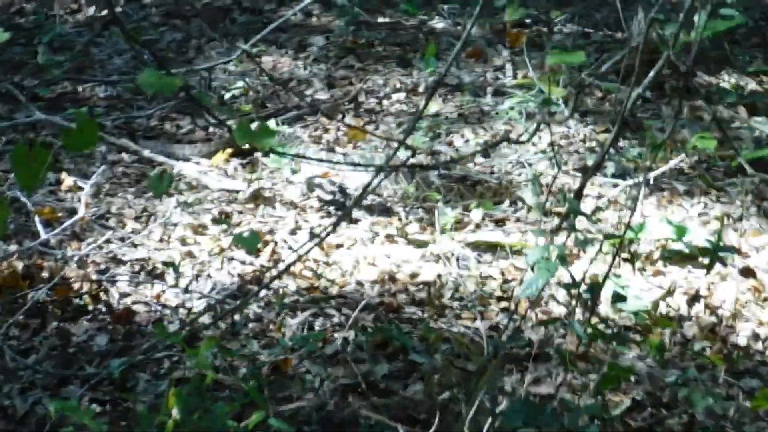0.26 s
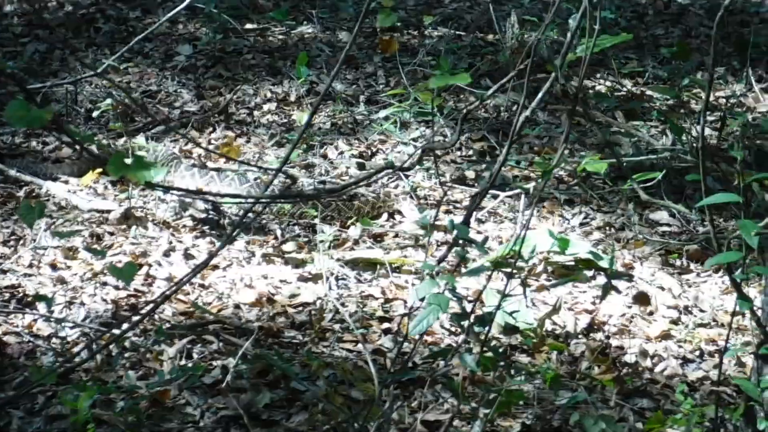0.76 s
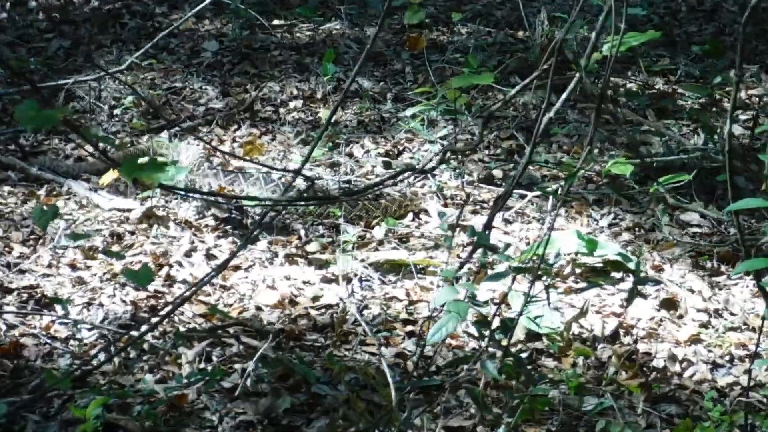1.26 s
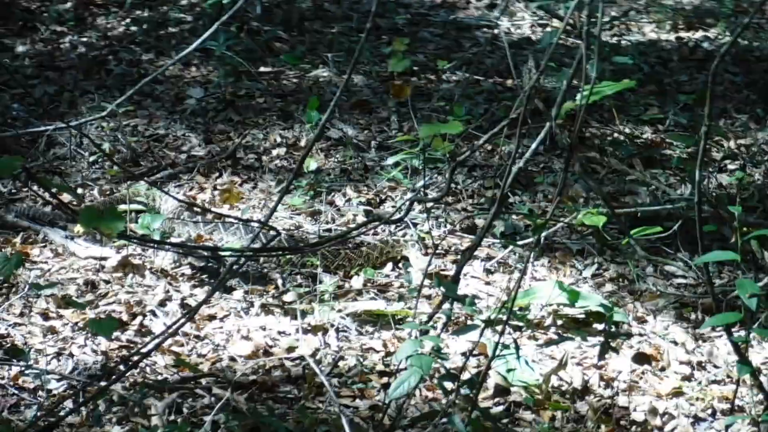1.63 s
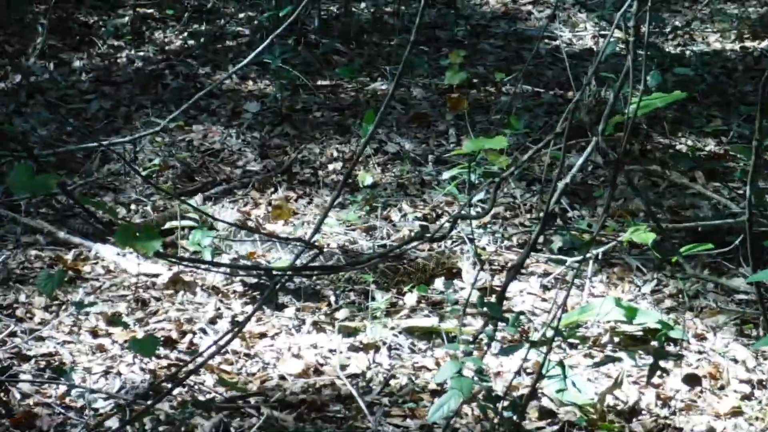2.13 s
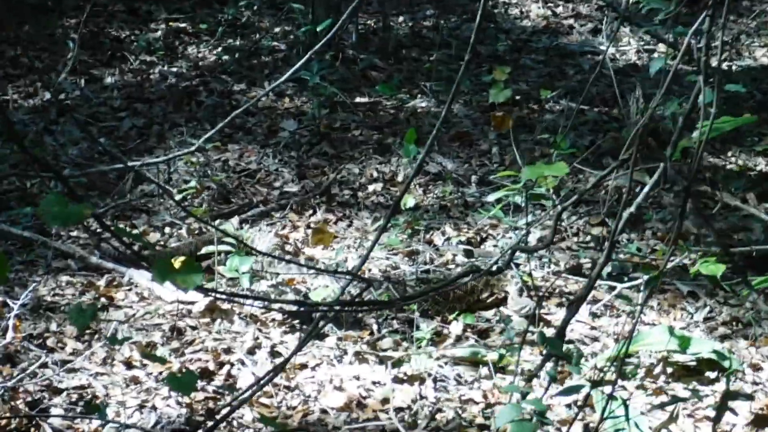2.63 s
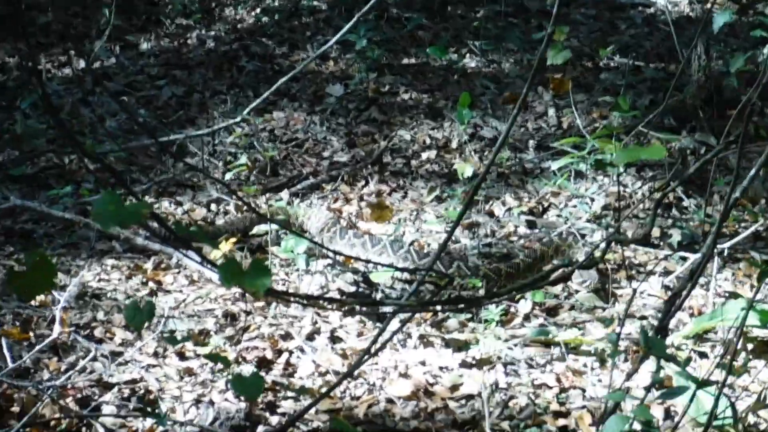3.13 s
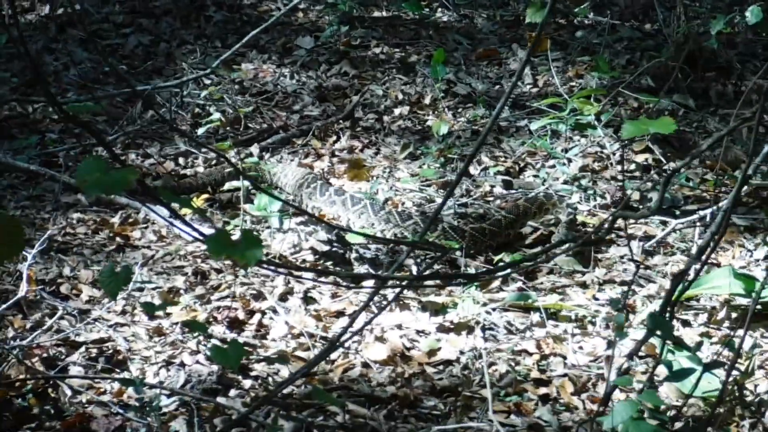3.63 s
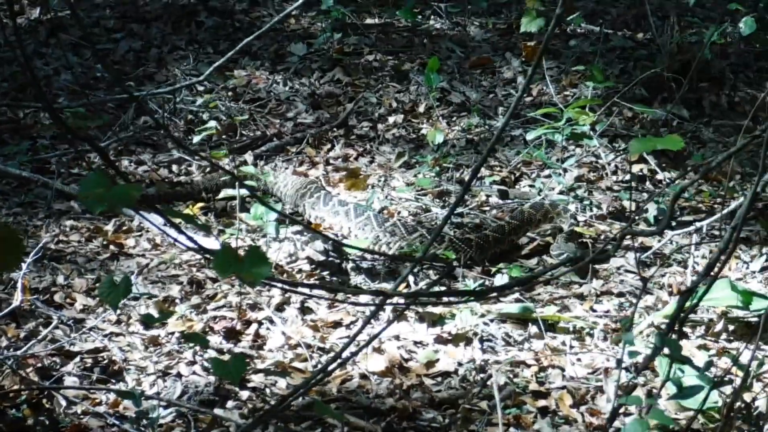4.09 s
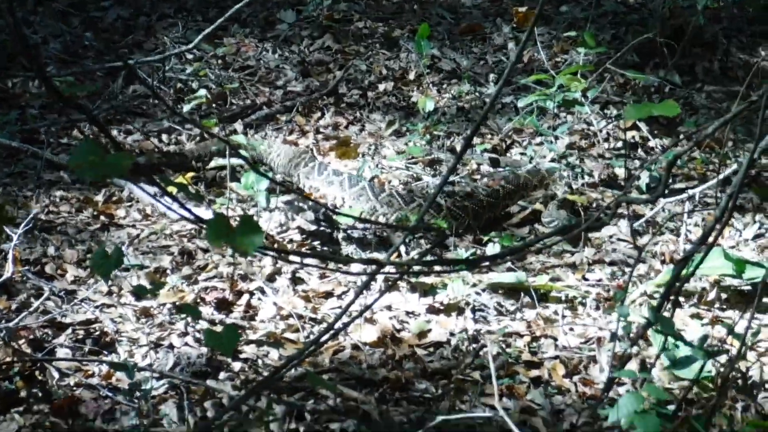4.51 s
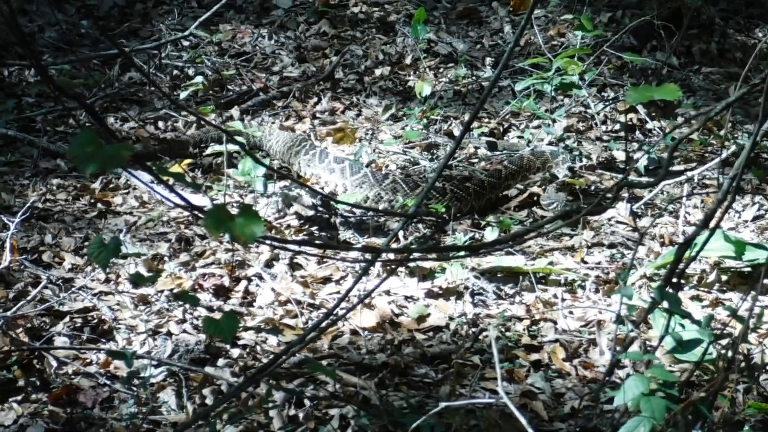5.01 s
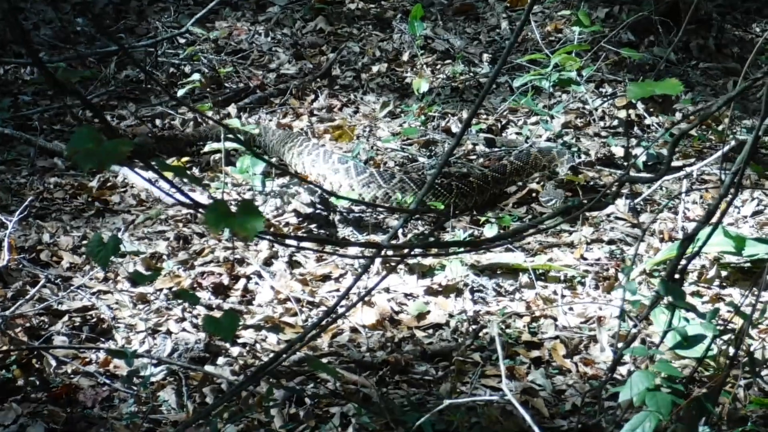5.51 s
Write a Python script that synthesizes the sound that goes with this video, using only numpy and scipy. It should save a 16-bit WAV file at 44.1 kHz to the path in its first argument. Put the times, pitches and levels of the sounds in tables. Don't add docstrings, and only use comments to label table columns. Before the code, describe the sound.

A heavy snake drags through dry leaves with dense crackling and sharp twig snaps, then settles into near-silence with faint ticks and a tiny squeak.

```python
import sys
import numpy as np
from scipy import signal
from scipy.fft import rfft, irfft, next_fast_len
from scipy.io import wavfile
from scipy.ndimage import uniform_filter1d

SR = 44100
rng = np.random.default_rng(int(sys.argv[2]) if len(sys.argv) > 2 else 0)


def invert_db(level):
    return 10 ** (np.asarray(level, dtype=float) / 20)


def master(y):
    cut = np.clip(np.atleast_2d(y).T, -1, 1)
    pcm = np.round(cut * 32767)
    wavfile.write(sys.argv[1], SR, pcm.astype(np.int16))


N = 253575
T = np.arange(N) / SR


def level(x, db):
    return x * invert_db(db) / np.sqrt(np.mean(x ** 2))


def colour(x, points):
    hz, db = np.transpose(points)
    octave_like = np.log(np.fft.rfftfreq(8192, 1 / SR) + 1)
    log_gain = np.interp(octave_like, np.log(hz), db) * np.log(10) / 20
    cepstrum = irfft(log_gain)
    cepstrum[1:4096] *= 2
    cepstrum[4097:] = 0
    return signal.fftconvolve(x, irfft(np.exp(rfft(cepstrum))))[:N]


def band(x, lo_hz, hi_hz):
    return signal.sosfilt(signal.butter(2, [lo_hz, hi_hz], "bandpass", fs=SR, output="sos"), x)


def smooth_twice(x, samples):
    return uniform_filter1d(uniform_filter1d(x, samples), samples)


def fade(x, ms):
    return signal.lfilter([1], [1, -np.exp(-1000 / (ms * SR))], x)


def walk(rate_hz):
    hold = int(SR / rate_hz)
    return smooth_twice(np.repeat(rng.standard_normal(N // hold + 1), hold), hold)[:N]


def glide(hz):
    return np.sin(2 * np.pi * np.cumsum(hz) / SR)


def tent(s, db, swell, ease):
    before, after = np.maximum(s - T, 0), np.maximum(T - s, 0)
    return invert_db(2 * (db - abs(swell) * before - abs(ease) * after))


# crest t/s, leaf level/dB, swell/dB per s, ease/dB per s, weight on the litter/dB
BODY_SHOVES = [(0.003, -33, 105, 102, 5.0), (0.299, -37, 30, 78, 2.5), (0.548, -38, 30, 66, -2),
               (0.737, -49, 116, 233, -6), (0.926, -60, 66, 26, 0), (1.061, -41, 301, 24, -1.0),
               (1.157, -38.5, 173, 42, 2), (1.296, -34, 97.5, 72, 3), (1.65, -55.5, 66, 20, 0.3),
               (1.944, -45.5, 53, 108, -2.5), (2.056, -43.5, 33, 177, 1.2), (2.39, -55, 110, 30, -10),
               (2.373, -40, 538, 97, 2), (2.484, -40, 131, 332, 7), (2.539, -41.1, 72, 1023, 2.5),
               (2.597, -51, 488, 15.5, 1.5), (2.731, -43.5, 99, 38, 2.7), (2.853, -40, 71, 61, 1),
               (3.039, -47, 18, 46, -2), (3.13, -51.5, 351, 22, -1.7), (3.517, -47.3, 44, 137, 0.2),
               (3.724, -57.1, 48, 8.5, 1.1), (4.436, -62.5, 0, 31, -3.5), (5.349, -61.5, 30, -5, -1)]
# level at a -40 dB shove/dB, slope/dB per dB, share of the weight
LEAF_LAYERS = [
    (-58, 0.48, 1.2),
    (-54, 0.6, 1.17),
    (-40.5, 1, 0),
    (-49.5, 1.0, 0.49),
]


def drag():
    creep_db = -72
    shoves = np.array([tent(*row[:4]) for row in BODY_SHOVES])
    total = shoves.sum(axis=0) + invert_db(2 * creep_db)
    weight_db = np.array(BODY_SHOVES)[:, 4] @ shoves / total
    shove_db = 10 * np.log10(total)
    return [db + slope * (shove_db + 40) + share * weight_db for db, slope, share in LEAF_LAYERS]


# f/Hz, level/dB per Hz
LEAF_COLOUR = [(88, -47.5), (150, -27.5), (201, -23.5), (230, -24.5), (413, -20.5), (916, -20), (1010, -20),
               (1330, -12.5), (1780, -12.5), (2420, -15.5), (4180, -7), (6050, 3), (7950, -6.5),
               (13200, -8.5), (15700, -16.5)]
LAYER_BORDERS = [1200, 3600, 9000]


def leaf_bands(drives):
    size = next_fast_len(N + 8192)
    octave = np.log2(np.fft.rfftfreq(size, 1 / SR) + 1)
    steps = [1]
    for hz in LAYER_BORDERS:
        across = np.clip((np.log2(hz) - octave) / 0.6 + 0.5, 0, 1)
        steps.append(np.cos(np.pi / 2 * across) ** 2)
    steps.append(0)
    leaf = rfft(colour(np.arange(N) == 0, LEAF_COLOUR), size)
    spectrum = 0
    for drive, above, beyond in zip(drives, steps, steps[1:]):
        part = leaf * (above - beyond)
        spectrum = spectrum + rfft(drive, size) * part / np.sqrt(np.mean(abs(part) ** 2))
    return irfft(spectrum, size)[:N]


def rustle(rate_hz=1900, spread_db=3.0, tint_db=2.5, crack_ms=0.5, tail_ms=6, tail_db=-15, clump_db=3.0):
    litter_db, stem_db, blade_db, edge_db = drag()
    happens, size = rng.random((2, N))
    clumps = invert_db(2 * clump_db * walk(60))
    power = (happens < rate_hz / SR) * invert_db(-2 * spread_db * np.log(size + 0.0074)) * clumps
    envelopes = []
    for db in (litter_db, stem_db + 0.5, blade_db, edge_db):
        hits = power * invert_db(2 * tint_db * rng.standard_normal(N))
        crack = fade(fade(hits, crack_ms), crack_ms / 2)
        shape = crack + invert_db(2 * tail_db) * fade(hits, tail_ms)
        local = smooth_twice(shape, 2200)
        envelopes.append(np.sqrt(shape / (local + 1e-12)) * invert_db(db))
    return leaf_bands(np.array(envelopes) * rng.standard_normal(N))


# t/s, peak level/dB, settling tail/dB
BLADE_CRACKS = [(.0424, -16, -28), (.0468, -5.5, -23), (.1634, -13, -36), (.172, -5.5, -28),
                (.2393, -16, -23), (.2654, -17, -26), (.3417, -20, -22), (.3716, -20, -26),
                (.4168, -13, -28), (.5174, -19, -34), (.5328, -16, -32), (.5399, -18, -20),
                (.61, -19.5, -26), (.7702, -21, -29), (1.3758, -14, -35), (1.4164, -19.5, -22),
                (1.4983, -19.5, -40), (1.5407, -26.5, -11.5), (1.946, -24, -24), (2.152, -25, -18),
                (2.6289, -20, -21), (2.916, -16.5, -22), (3.0705, -16, -19), (3.2156, -23.5, -31),
                (3.506, -23, -37), (3.5234, -26, -38), (3.5418, -27, -29), (4.2337, -32, -20),
                (5.029, -36, -24), (5.4131, -34, -19)]
# t/s, peak level/dB, brightness/dB
RIM_SHATTERS = [(.0059, -6.5, -8.5), (0.0629, -17, -2), (0.0957, -13.5, -14), (0.1078, -20, -12),
                (0.2195, -15.5, -6.5), (0.2863, -12, -12), (0.2932, -10.5, -9), (.4322, -7, -8),
                (.7461, -25, -7), (1.0044, -21.5, -9), (1.041, -27, -19), (1.2724, -18, -17),
                (1.8011, -25.5, -5), (1.864, -18, -14), (1.9091, -16, -9), (2.3725, -21, -16),
                (2.4842, -13.5, -13), (2.5144, -11.5, -10), (2.5253, -15.5, -7), (2.663, -21, -7),
                (2.9859, -11, -12), (3.8387, -31.5, -13), (3.895, -27, -16), (4.385, -32.5, -9),
                (.9617, -33, -20), (3.47, -20, -12), (5.5094, -39, -18), (5.576, -38, -6),
                (.2075, -22, -16), (1.2191, -28, -25)]
# t/s, peak level/dB, brightness/dB, settling tail/dB
STALK_BREAKS = [(0.1455, -22, -11, -12), (0.1498, -15.5, -19, -20), (0.3244, -21, -20, -16),
                (.3954, -17, -10, -10), (.5802, -18, -29, -34), (1.1408, -15.5, -19, -20),
                (1.1667, -12, -6, -20.5), (1.2408, -22.5, -18, -12), (1.3138, -16.5, -5, -24),
                (1.564, -23, -9, -17), (1.726, -10, -16.5, -17.5), (1.813, -22.5, -23, -28),
                (1.8764, -22, -6, -22), (1.893, -13, -14, -19.5), (1.981, -21.5, -21, -24),
                (2.0364, -29, -19, -11), (2.2216, -18, -17, -15.5), (2.4033, -18.5, -13, -9),
                (2.4161, -15, -11, -13), (2.4346, -20, -9, -10), (2.7075, -16, -15, -19),
                (2.8054, -14.5, -3, -24), (2.9515, -21.5, -9, -15), (3.021, -22.5, -5, -27),
                (3.4137, -23.5, -11, -13), (3.4353, -12.5, -18, -26), (4.175, -30, -10, -18),
                (5.3798, -29, -17, -20), (5.6064, -32, -6, -22), (5.742, -34, -12, -19)]
# t/s, peak level/dB, thud/dB, body/dB
TWIG_SNAPS = [(.0252, -14.5, -16, -17), (0.4113, -11, -9.5, -1), (0.6688, -31, -9, 1),
              (0.6973, -8.5, -15, -7.5), (0.9851, -11.5, -10.5, -4.5), (1.5915, -22, -18, -15),
              (1.719, -20.5, -11.5, -7), (2.2485, -21, -11, 2), (2.2987, -31, -13, 0),
              (2.3118, -31.5, 4.5, 4.5), (2.3928, -10.5, -21, -11), (2.4425, -16.5, -12.5, -7),
              (2.4524, -22, -15, -11), (2.4706, -25, -16.5, -3), (2.6796, -17.5, -11.5, -14),
              (2.7322, -19, -19, -18), (2.7485, -17, -12, -5.5), (2.769, -27.5, -4, -3),
              (2.792, -27, -2.5, -5), (2.8905, -12, -18, -14), (3.1025, -19, -26, -8),
              (3.1229, -23, -19, -10), (3.7526, -29.5, -23, -4), (4.1545, -33.5, -22, 0),
              (5.214, -35.5, -8, -11), (0.077, -22, -22, -12), (1.345, -28.5, 0.5, 0),
              (1.405, -35.5, 3, -8)]
# t/s, peak level/dB, thud/dB, body/dB
STICK_BREAKS = [
    (.0004, -11, -21, -16),
    (0.4, -13, -25, -26),
    (2.192, -34, -20, -12),
    (3.315, -31, -16, -2),
    (2.8125, -20, -34, -18),
    (1.612, -34, -2, 0.5),
    (1.8484, -21.5, -5.5, -1.5),
    (2.06, -25, -6, -20),
    (2.0155, -5.5, -12, -5.5),
    (2.1081, -28.5, -9, -21),
]


def breaks():
    blades = [(s, db, -35, -28.5, -24, tail) for s, db, tail in BLADE_CRACKS]
    rims = [(s, db, -40, -22, bright, -23.5) for s, db, bright in RIM_SHATTERS]
    stalks = [(s, db, -26, -10, bright, tail) for s, db, bright, tail in STALK_BREAKS]
    twigs = [(*row, -12.5, -22) for row in TWIG_SNAPS]
    sticks = [(*row, -49, -21) for row in STICK_BREAKS]
    return blades + rims + stalks + twigs + sticks


def snaps(crest_db=-5, rise_ms=0.99, burst_ms=0.51, tail_ms=5.7):
    power, jolt = np.zeros((4, N + SR)), np.zeros((4, N))
    ms = np.arange(SR // 20) * 1000 / SR
    lag = int(0.0012 * SR)
    jolt_db, tear_db = np.array([13, 9, 8, 7]), np.array([-7, -2, 4, 6])
    rise = (1 - np.exp(-ms / rise_ms)) ** 2
    tear = np.exp(-2 * ms / burst_ms) * invert_db(2 * 3.95)
    for s, db, thud, body, bright, tail_db in breaks():
        i = int(s * SR)
        gain = invert_db(db + crest_db + np.array([thud, body, 0, bright]))
        settling = invert_db(2 * (tail_db + 0.5)) * np.exp(-ms / tail_ms)
        power[:, i:i + len(ms)] += np.outer((gain * invert_db(tear_db)) ** 2, rise * (tear + settling))
        jolt[:, i + lag] += gain * invert_db(jolt_db)
    tearing = np.sqrt(power[:, :N]) * rng.standard_normal(N)
    return leaf_bands(jolt + 0.1 * np.roll(jolt, lag, axis=1) + tearing)


# f/Hz, level/dB per Hz
WOOD_COLOUR = [(12, -44), (20, -5), (85, -5.5), (133, -2.5), (197, -5), (635, -15), (863, -13),
               (1050, -24.5), (1280, -10.5), (1830, -22), (2230, -22.5), (3480, -25), (5920, -16),
               (8990, -26), (15700, -27)]


def wood_air():
    return level(colour(rng.standard_normal(N), WOOD_COLOUR), -57) * invert_db(1.0 * walk(3.38))


# centre f/Hz, width/Hz, level/dB
CHORUS_BANDS = [
    (1288, 128, -66.5),
    (1550, 280, -68.5),
    (5080, 720, -70.5),
]


def chorus():
    out = np.zeros(N)
    for hz, width, db in CHORUS_BANDS:
        voices = band(rng.standard_normal(N), hz - width / 2, hz + width / 2)
        out += level(voices, db) * invert_db(2.0 * walk(16))
    return out


# on t/s, off t/s, level/dB
MOTOR_RUNS = [
    (.0, 0.763, -65),
    (1.694, 2.83, -63),
    (3.72, 4.2, -69.5),
    (4.417, 5.75, -64),
]


def lens_motor():
    runs = sum(invert_db(db) * (T >= on) * (T < off) for on, off, db in MOTOR_RUNS)
    tone = glide(138.9 * (1 + 0.012 * walk(6)))
    return np.sqrt(2) * uniform_filter1d(runs, 1500) * tone * invert_db(3.0 * walk(20))


def drone():
    return level(band(rng.standard_normal(N), 118.9 - 4, 118.9 + 4), -73)


# t/s, level/dB
GRIP_SHIFTS = [(0.0, -52), (1.73, -56), (2.02, -55), (2.22, -62), (2.56, -61), (3.03, -61.5), (3.27, -61.5),
               (3.6, -61), (5.6, -62), (4.23, -68), (4.55, -66), (4.79, -67)]


def hand_grip():
    rest_db, swell_db_s, ease_db_s = -68, 110, 112
    power = invert_db(2 * rest_db) + sum(tent(s, db, swell_db_s, ease_db_s) for s, db in GRIP_SHIFTS)
    return level(band(rng.standard_normal(N), 28, 88), 0) * np.sqrt(power)


# t/s, f/Hz, level/dB, 60 dB decay/s
STICK_KNOCKS = [
    (1.8478, 300, -11, .022),
    (1.8486, 500, -19, .013),
    (1.8486, 680, -26, .012),
    (2.0166, 300, -20, .012),
    (2.0168, 110, -24, .03),
    (2.105, 480, -46, .03),
    (2.3112, 780, -41, .015),
    (3.436, 1200, -33, .025),
]


def knocks():
    out = np.zeros(N)
    for s, hz, db, t60 in STICK_KNOCKS:
        t = np.maximum(T - s, 0)
        swing = (1 - np.exp(-1.6 * hz * t)) ** 2
        out -= invert_db(db - 60 * t / t60) * swing * np.sin(2 * np.pi * hz * t)
    return out


# multiple of f, level/dB, extra fade/dB per s
SQUEAK_PARTIALS = [
    (2, -4.5, 30),
    (2.29, -11, 150),
    (3, 0, 0),
    (3.45, -6, 90),
    (4, -12, 120),
]


def squeak(wobble=0.007, flutter_db=3.5):
    start_s, arch_s, end_s, sag_s = 5.252, 5.275, 5.63, 0.085
    top_hz, rest_hz, rise_hz = 2140, 1960, 60
    late = np.maximum(T - arch_s, 0) / sag_s
    early = np.clip((arch_s - T) / (arch_s - start_s), 0, 1)
    sag = (1 + 2 * late) * np.exp(-2 * late)
    hz = rest_hz + (top_hz - rest_hz) * sag - rise_hz * early ** 2
    phase = 2 * np.pi * np.cumsum(hz * (1 + wobble * walk(500))) / SR
    sounding = uniform_filter1d(1.0 * (T > start_s) * (T < end_s), 900)
    gate = sounding * invert_db(-61 - 13 * (T - start_s))
    voice = invert_db(-3) * (T > 5.3) * (T < 5.375) * glide(6400 * (1 + wobble * walk(400)))
    age = np.maximum(T - arch_s - 0.05, 0)
    for multiple, db, fade_db_s in SQUEAK_PARTIALS:
        partial_db = db + flutter_db * walk(150) - fade_db_s * age
        voice = voice + invert_db(partial_db) * np.sin(multiple * phase)
    return np.sqrt(2) * gate * voice


def scene():
    snake = rustle() + snaps() + knocks() + squeak()
    camera = lens_motor() + drone() + hand_grip()
    return (snake + wood_air() + chorus() + camera)[None]


def roll_off(x):
    return signal.sosfilt(signal.butter(12, 16480, fs=SR, output="sos"), x)


def record(dry):
    top_cut = signal.ellip(10, 0.2, 36, 15760, fs=SR, output="sos")
    return roll_off(signal.sosfilt(top_cut, dry))


dry = scene()
out = record(dry)
master(out)
```